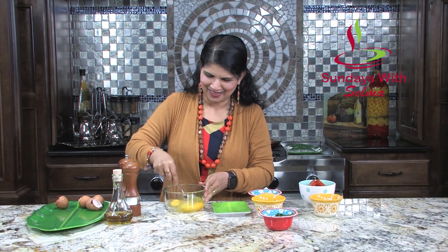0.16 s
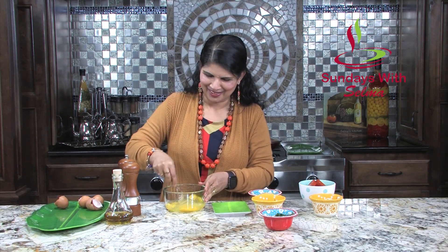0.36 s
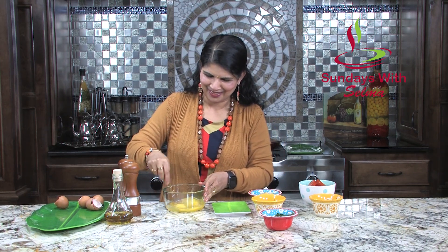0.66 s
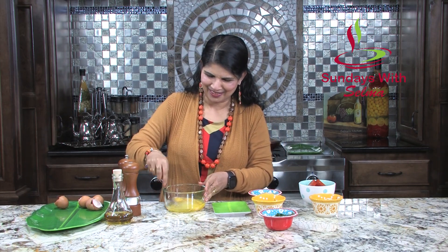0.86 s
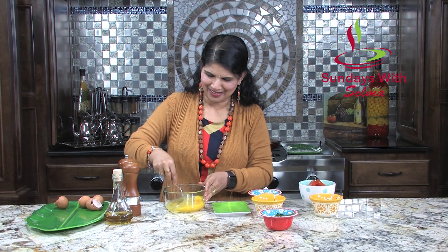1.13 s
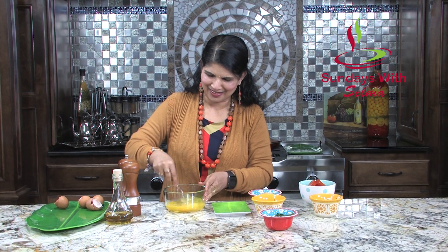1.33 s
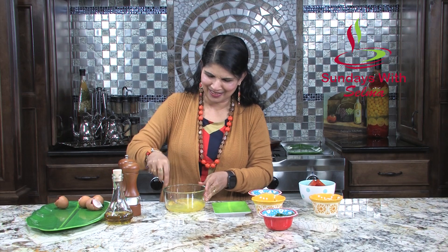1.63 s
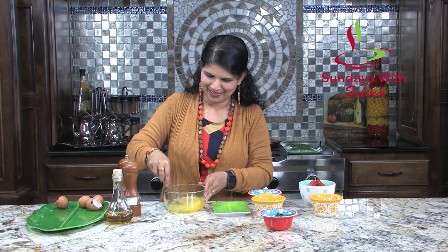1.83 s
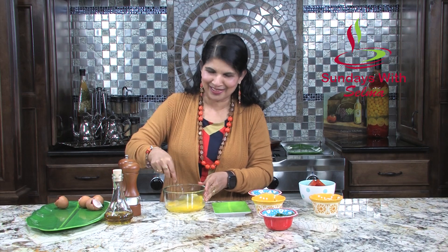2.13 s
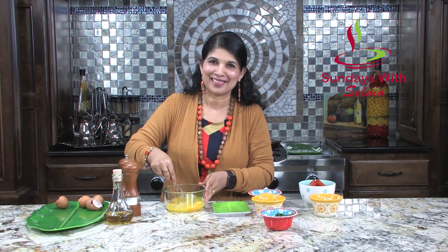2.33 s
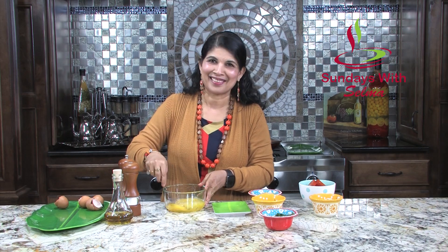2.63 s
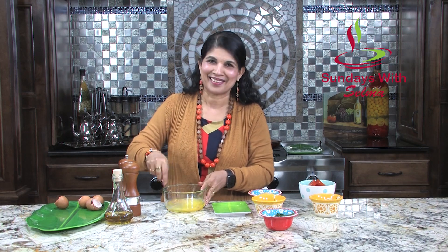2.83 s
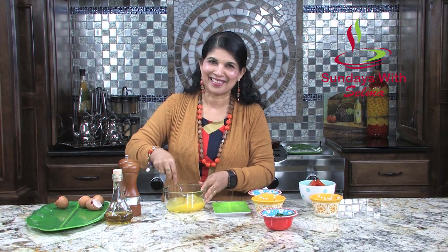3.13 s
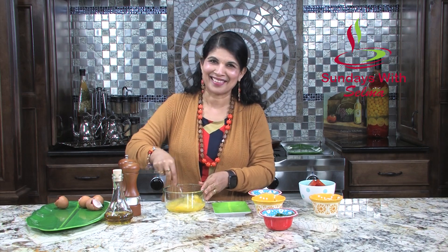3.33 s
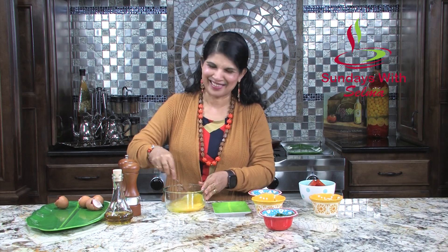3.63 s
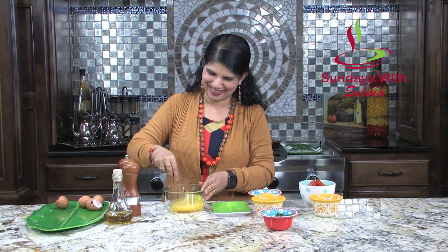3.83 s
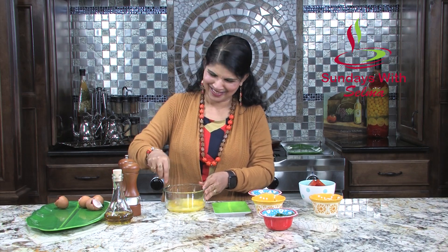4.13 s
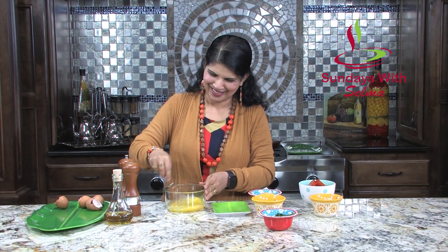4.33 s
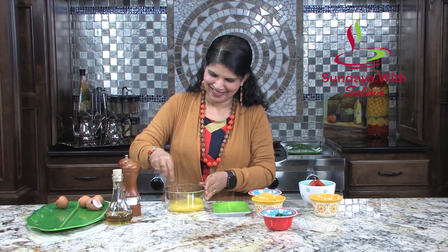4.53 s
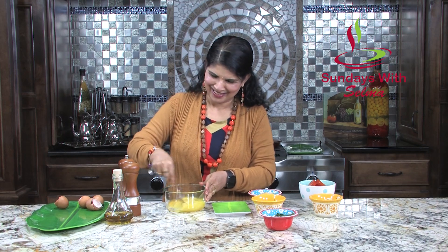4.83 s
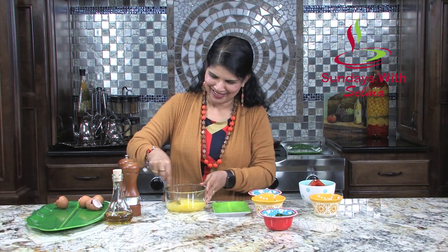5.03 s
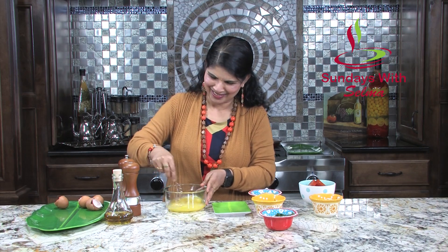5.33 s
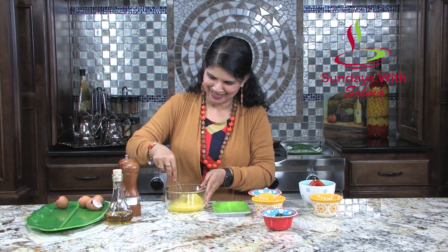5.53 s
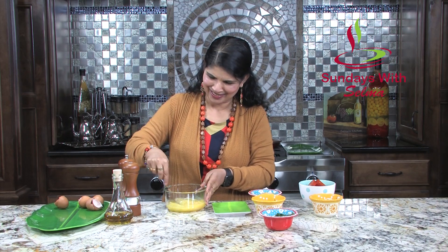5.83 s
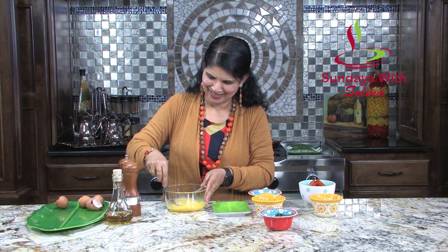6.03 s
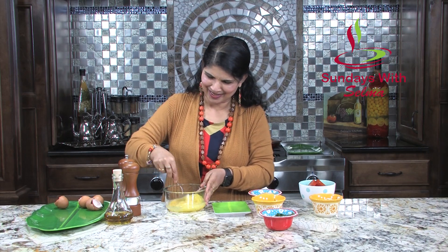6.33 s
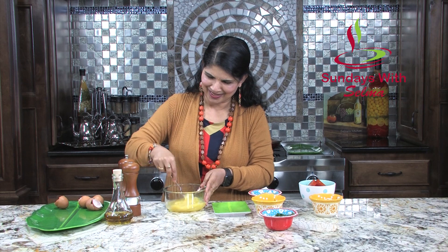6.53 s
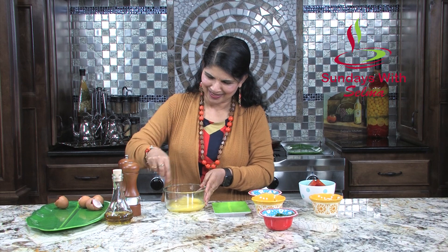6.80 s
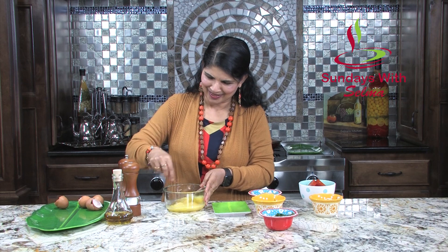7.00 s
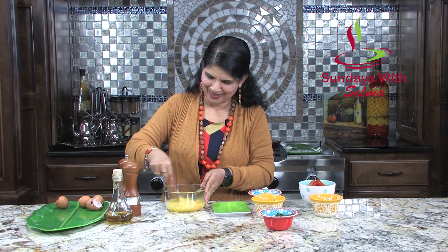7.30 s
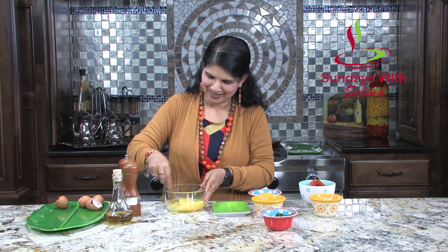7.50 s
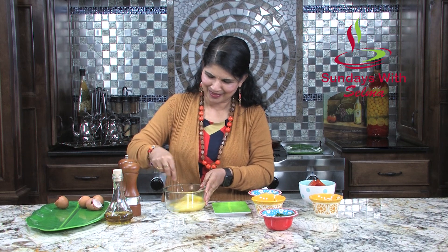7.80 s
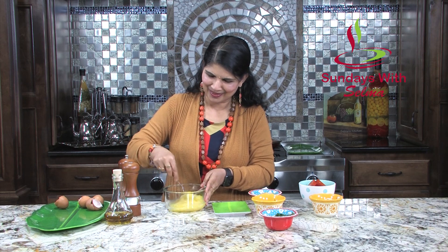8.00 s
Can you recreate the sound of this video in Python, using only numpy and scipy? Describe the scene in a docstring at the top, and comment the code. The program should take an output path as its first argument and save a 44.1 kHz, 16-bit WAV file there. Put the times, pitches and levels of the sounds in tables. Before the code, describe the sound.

A metal fork beats liquid egg in a glass bowl, striking about five times a second. Each stroke gives a crisp, short, damped clink, often with a rattle of tines, plus small wet plops and bubbles. The clinks grow sharper and louder in the last third. One microphone hears it in a reflective kitchen, with a faint low thump after hard hits.

```python
"""Sharp clinks of a fork on a glass bowl, about five strokes a second, in a hard-walled kitchen.
Clinks are noisy tine contacts filtered by a crack and glass rings; plops are damped rising sines in egg.
Plops excite the lowest rings; small bubbles and grazes fill in; sparse noise tails ring the room on.
The single microphone bends under the loud clinks, which adds a low thump after each."""
import sys
import numpy as np
from scipy import signal
from scipy.fft import rfft, irfft
from scipy.io import wavfile

SR = 44100
rng = np.random.default_rng(int(sys.argv[2]) if len(sys.argv) > 2 else 0)


def persist_wave(psi):
    """Save psi, clipped to +-1, as 16-bit WAV."""
    counts = np.round(np.clip(psi, -1, 1) * 32767).astype(np.int16)
    wavfile.write(sys.argv[1], SR, np.atleast_2d(counts).T)


N = 359856  # samples
LEAD_S = 0.015  # longest graze before a clink


def gain_of(db):
    """Decibels to an amplitude factor."""
    return 10 ** (np.asarray(db) / 20)


def read(points, hz, order=1):
    """One table column, interpolated along log frequency."""
    columns = np.transpose(points)
    return np.interp(np.log(hz + 1), np.log(columns[0] + 1), columns[order])


def add(mix, s, sound):
    """Mixes a sound in at time s, cut at the end of the mix."""
    part = mix[round(s * SR):][:len(sound)]
    part += sound[:len(part)]


def causal(db):
    """Minimum-phase pulse for a gain given on an rfft grid."""
    mirrored_db = np.concatenate([db, db[-2:0:-1]])
    log_gain = np.log(gain_of(mirrored_db))
    spectrum = np.exp(np.conj(signal.hilbert(log_gain)))
    return np.fft.ifft(spectrum).real[:len(db) // 2]


# still-room noise spectrum: f/Hz, relative level/dB
AIR_SPECTRUM = [(20, -2), (60, -1), (300, -25.5), (1500, -46), (6000, -15), (16000, -30)]


def still_air(rms_db=-56):
    """Faint steady room noise: Gaussian noise shaped in frequency."""
    hz = np.fft.rfftfreq(N, 1 / SR)
    spectrum = rfft(rng.standard_normal(N)) * gain_of(read(AIR_SPECTRUM, hz))
    noise = irfft(spectrum, N)
    return gain_of(rms_db) * noise / noise.std()


# room tail: f/Hz, t60/s, level/dB
KITCHEN_BANDS = [(830, 0.79, -0.5), (1270, 0.46, -2), (1870, 0.6, 3.5), (2700, 0.53, -1.5), (3240, 0.4, 7),
                 (4600, 0.42, -3.5), (5240, 0.58, -4.5), (9300, .48, 1), (14500, 0.38, -3)]


def kitchen(x, gap_ms=0.76, half_turns_per_s=1.3, bass_cut_hz=845.0):
    """Three sparse tails, each band dying at its own speed, fed in turn as the bowl and hand shift."""
    # one random-sign echo per 20 samples
    taps = np.zeros((3, SR))
    at = np.arange(0, SR - 20, 20) + rng.integers(0, 20, (3, (SR - 1) // 20))
    np.put_along_axis(taps, at, rng.choice([-1., 1.], at.shape), 1)

    hz, t, bands = signal.stft(taps, SR, nperseg=256)
    level_db = read(KITCHEN_BANDS, hz, order=2)[:, None]
    decay_db = 60 * t / read(KITCHEN_BANDS, hz)[:, None]
    tails = signal.istft(bands * gain_of(level_db - decay_db), SR, nperseg=256)[1]

    # echoes arrive in clumps
    clumps = rng.lognormal(0, 0.38, (3, len(t))).repeat(128, axis=1)
    tails = tails * clumps[:, :tails.shape[1]]
    ms = np.arange(tails.shape[1]) * 1e3 / SR
    tails *= 1 - np.exp(-(ms / gap_ms) ** 2)

    half_turns = np.arange(N) * half_turns_per_s / SR + np.arange(3)[:, None] / 3
    share = np.cos(np.pi * half_turns) * np.sqrt(2 / 3)
    wet = signal.fftconvolve(x * share, tails / np.linalg.norm(tails[0]), axes=1)[:, :N].sum(0)
    return signal.sosfilt(signal.butter(2, bass_cut_hz, "high", fs=SR, output="sos"), wet)


# bare contact: f/Hz, level/dB
CONTACT = [(300, -36.5), (1500, -4), (2800, -8.5), (4500, -4.5), (5300, -1.5), (11500, -2.5), (12800, -7.5),
           (15500, -48.5)]
# fork and bowl, damped by hand and egg: nominal f/Hz, nominal width/Hz
RINGS = [(1700, 120), (2760, 110), (3660, 80), (5520, 110), (6240, 300), (7400, 200), (8480, 180),
         (10330, 230), (11780, 170), (13830, 200), (15500, 200)]
# one per ring: nominal level/dB
RING_LEVELS = [-0.5, -9, -2, 12.5, 7, -2.5, 4, 1.5, 1.5, 4.5, -5.5]


def clink(db, chatter_ms, tilt_db_per_oct, spread_db=5.5, shift=0.0096, wider=2.3,
          touches_per_ms=11.0, rise=0.41, uneven=0.34, lead_db=-34.5, lead_ms=5.2):
    """Tine contacts crack and ring the modes: returns the sound straight ahead and that to the walls."""
    hz = np.fft.rfftfreq(4096, 1 / SR)
    chances = rng.uniform(-1.7, 1, (len(RING_LEVELS), 2))
    # uneven colour from clink to clink, 3.5 dB std at the knots
    colour_db = 3.5 * np.interp(hz, np.geomspace(800, 16000, 12), rng.standard_normal(12))
    colour_db += tilt_db_per_oct * np.clip(np.log2((hz + 1) / 7000), -2, 1)

    def body(blur, ring_spread_db):
        """Crack plus resonances; egg and grip shift each ring a little from blow to blow."""
        power = gain_of(2 * read(CONTACT, hz))
        for (f, width), level_db, (a, b) in zip(RINGS, RING_LEVELS, chances):
            detune = 2 * (hz - f * (1 + shift * b)) / width / blur
            power += gain_of(2 * (level_db + ring_spread_db * a)) / blur / (1 + detune ** 2)
        return causal(10 * np.log10(power) + colour_db)

    weight, heft = rng.standard_normal((2, 1400))
    chance = rng.random(1400)
    ms = (np.arange(1400) / SR - LEAD_S) * 1e3
    u = np.maximum(ms / chatter_ms, 0)
    # faint graze as the tines close in, then uneven contacts that die away
    force = np.tanh(u / rise) * np.exp(-2 * u)
    force += gain_of(lead_db) * np.exp(-abs(ms) / lead_ms)
    force *= np.exp(uneven * heft) * (chance < touches_per_ms * 1e3 / SR)

    ahead = signal.fftconvolve(weight * force, body(0.66, spread_db))
    # over all directions only the body's colour remains, its rings smeared and evened
    around = body(wider, spread_db / 2)
    size = gain_of(db) * np.sqrt(chatter_ms * SR / 1e3)
    return size * ahead / np.linalg.norm(ahead), size * around / np.linalg.norm(around)


# tines meet the glass: t/s, level/dB, chatter/ms, treble lean/(dB/octave)
STROKES = [(0.117, -29, 1.1, -8.5), (0.142, -12, 0.29, -2.5), (0.149, -27.5, 15, 0.5),
           (0.3458, -23.5, 2.2, -5.5), (0.3536, -17.5, 3.5, -2.5), (0.3615, -16, 1.9, -2.5),
           (0.5547, -18.5, 3.5, -1), (0.7414, -22, 2.2, -2.5), (0.7495, -19, 5.2, -1),
           (0.9353, -19, 2.2, -11), (0.939, -13, 2.34, -1), (1.132, -18.5, 5.7, -2.5),
           (1.3218, -14.5, 2.7, 0), (1.416, -34, 1.1, 8), (1.512, -13, 5.1, -1), (1.6965, -29, 1.8, -5),
           (1.705, -18.5, 4.2, 0), (1.746, -27, 4.4, 4), (1.8858, -28, 1.5, -18), (1.8907, -11.5, 1.75, 1),
           (1.94, -27, 0.82, -1), (2.081, -12, 0.89, 1.5), (2.304, -13.5, 3.75, 0.5),
           (2.375, -30.0, 4.1, -5), (2.4979, -25.5, 1.5, -2.5), (2.504, -16.5, 2.9, -1),
           (2.67, -30.5, 1.55, 9.5), (2.7048, -19, 3.4, 1.5), (2.8675, -19.5, 0.45, -4),
           (2.9133, -19.5, 13, -3), (2.9221, -20.5, 3.2, -3.5), (3.1244, -17.5, 4.8, 0),
           (3.14, -20, 3.7, 3), (3.1668, -19.5, 0.26, 1), (3.3289, -15, 2.7, 2), (3.3763, -20.5, 1.3, 2),
           (3.534, -15, 1.06, 2.0), (3.5473, -12.5, 1.65, -0.5), (3.6037, -27, 5.4, -1),
           (3.772, -17.5, 0.95, -5), (3.7753, -20, 1.8, -3), (3.7853, -18, 2.9, -0.5),
           (3.8178, -23.5, 0.7, 1), (3.8389, -26, 4.4, -1.5), (4.005, -16.5, 3.8, 1.5),
           (4.041, -21, 0.65, 0), (4.2092, -23.5, 1.5, -4), (4.2264, -21.5, 5.1, 1), (4.284, -29, 1.5, -2),
           (4.432, -24, 4.3, -5.5), (4.437, -20, 7.4, 2.5), (4.49, -24.5, 0.8, -6), (4.616, -34, 0.8, -5),
           (4.64, -29.5, 1.2, -11), (4.6569, -12.5, 1.86, -2), (4.6921, -25.5, 1.1, -1.5),
           (4.8429, -14, 0.31, -3.0), (4.854, -21.5, 1.1, -16), (4.8599, -18.5, 4.6, -0.5),
           (5.0603, -11.5, 1.3, 2), (5.1033, -26, 0.89, -7), (5.125, -24.5, 3.5, 4),
           (5.2483, -23.5, 1.3, -7), (5.2642, -20, 4.4, 0), (5.3082, -23.5, 1.0, 1), (5.324, -23, 2.4, 0.5),
           (5.4627, -11.5, 1.15, 1.5), (5.5131, -24.5, 3.9, 2.5), (5.6734, -20, 5.2, -0.5),
           (5.7262, -25.5, 2.3, 2), (5.7648, -30, 1.5, -5), (5.881, -9.5, 0.41, 0),
           (6.085, -17, 0.85, -2.5), (6.0912, -11.5, 1.43, 3), (6.147, -23, 5.7, 0),
           (6.2916, -20.5, 0.85, -4), (6.299, -7, 0.82, -1), (6.469, -26.5, 2.7, 1),
           (6.501, -7.5, 0.48, -0.0), (6.511, -14.5, 1.1, 3), (6.532, -23, 0.71, -2),
           (6.6994, -15, 1.1, 3.5), (6.7487, -21.5, 6.1, -0.5), (6.9016, -10, 1.03, -0.5),
           (6.961, -22, 2.2, 2.5), (7.0873, -19, 0.96, -7), (7.1095, -10, 1.1, -1),
           (7.1448, -20, 3.9, -0.5), (7.3032, -15, 2.2, -4), (7.3142, -14, 1, 0), (7.3681, -19.5, 1.1, 0.5),
           (7.5279, -13.5, 3.3, -3.5), (7.728, -20, 0.99, -7), (7.74, -10, 1.7, -2.5),
           (7.9484, -14, 1.7, -11.5), (7.9519, -18.5, 5.4, -1), (7.996, -22, 0.82, 7.5)]


def strokes(near, walls):
    """Fork blows: chatter goes ahead, its smeared colour goes to the walls."""
    for s, *row in STROKES:
        ahead, around = clink(*row)
        add(near, s - LEAD_S, ahead)
        add(walls, s, gain_of(-7.5) * around)
    # the stroke before still hangs in the room
    add(walls, 0, clink(-25.5, 2.0, 0)[1])


def plop(db, hz, t60_ms, rise_ms=0.57, climb=0.026):
    """A bubble rings briefly and climbs in pitch as it nears the surface."""
    t = np.arange(round(t60_ms * SR / 1e3) + 50) / SR
    u = t * 1e3 / t60_ms
    shape = (1 - np.exp(-t * 1e3 / rise_ms)) * gain_of(db - 60 * u)
    return -shape * np.sin(2 * np.pi * hz * t * (1 + climb * u))


# air pockets and slaps in the egg: t/s, level/dB, f/Hz
POCKETS = [(0.117, -23, 582), (.164, -32, 1730), (.21, -32, 1470), (0.348, -16, 1280), (0.386, -23, 1270),
           (0.437, -32, 1320), (0.354, -11, 2950), (0.538, -24, 1560), (.549, -26, 750),
           (0.5645, -20.5, 1025), (0.5816, -17.5, 1736), (.706, -26, 1644), (0.7492, -15, 4360),
           (0.7513, -11.5, 2330), (0.9379, -10.5, 2430), (1.1299, -20.5, 1404), (1.166, -24.5, 1150),
           (1.3054, -39, 2680), (1.4225, -32, 1430), (1.5112, -20, 976), (1.534, -25, 650),
           (1.6994, -16.5, 1470), (1.706, -20, 630), (1.749, -25, 1690), (1.8896, -15.5, 892),
           (2.0827, -20, 1626), (2.115, -23, 1186), (2.154, -27.5, 970), (2.155, -24.5, 2306),
           (2.3028, -14.5, 1980), (2.5006, -25.5, 1003), (2.5847, -21.5, 3140), (2.867, -21, 1073),
           (2.9175, -14, 2300), (2.9227, -20, 1050), (2.972, -18.5, 1654), (3.3137, -27, 1940),
           (3.3782, -26, 1680), (3.3782, -18.5, 3620), (3.424, -36, 1180), (3.4979, -36.5, 1680),
           (3.5352, -21.5, 1084), (3.612, -26, 1680), (3.771, -12, 738), (3.989, -18, 1840),
           (4.192, -22.5, 970), (4.2094, -24.5, 993), (4.492, -28, 1136), (4.658, -21.5, 2020),
           (4.724, -24.5, 1360), (4.759, -21, 1100), (4.8446, -20, 977), (5.062, -12.5, 2110),
           (5.0896, -21, 1940), (5.1266, -20.5, 1700), (5.2278, -29, 1880), (5.247, -21.5, 3350),
           (5.264, -13, 852), (5.509, -26, 1640), (5.6584, -29, 3730), (5.739, -18.5, 3530),
           (6.087, -22, 1780), (6.094, -12, 922), (6.152, -24, 1700), (6.3, -26.5, 1550),
           (6.3318, -24.5, 1730), (6.47, -27, 945), (6.5007, -18, 2490), (6.703, -22, 1606),
           (6.754, -12.5, 3590), (6.8943, -13.5, 1016), (6.9364, -19.5, 1570), (7.0876, -18, 956),
           (7.113, -22, 697), (7.146, -15, 3700), (7.272, -26.5, 1655), (7.305, -15, 654),
           (7.3564, -19, 997), (7.382, -14, 4200), (7.526, -19, 620), (7.5261, -18.5, 970),
           (7.7428, -11.5, 705), (7.9473, -13, 1820), (7.947, -22.5, 515), (8.128, -29.5, 1560)]


def pockets(egg, walls, t60_at_1khz_ms=31.6, quickens=0.88, wall_t60_ratio=0.41):
    """Air pockets plop in the egg; smaller, higher ones die sooner."""
    for s, db, hz in POCKETS:
        t60_ms = t60_at_1khz_ms * (1e3 / hz) ** quickens
        sound = plop(db, hz, t60_ms)
        # the slap that opens the pocket
        add(sound, 0, plop(db - 12.0, 3.17 * hz, 0.47 * t60_ms, 0.5))
        add(egg, s, sound)
        # the bowl beams high plops upward: less of them reaches the walls, shorter and broader
        wall_gain = gain_of(1.0 - 5.75 * np.log2(hz / 800))
        add(walls, s, wall_gain * plop(db + 4.5, hz, t60_ms * wall_t60_ratio, climb=0.036))


def bowl(egg, db=-1.0):
    """Plops close in pitch to the three lowest rings set the glass going."""
    rings = [signal.lfilter(*signal.iirpeak(f, f / width, SR), egg) for f, width in RINGS[:3]]
    return gain_of(db) * sum(rings)


def slosh(tries_per_s=900, db=-40.0, spread_db=4.0, lag_s=0.036,
          graze_db=-39.5, graze_tries_per_s=190, most=3.):
    """Small bubbles ring and tines graze the glass lightly, most often just after the firm strokes."""
    stir = np.zeros(N)
    for s, level_db, *_ in STROKES:
        add(stir, s, gain_of(level_db * .5) * np.exp(-np.arange(9000) / SR / lag_s))
    stir = stir / stir.mean() / most  # chance that a try sounds
    out = np.zeros(N)

    for place, u, size, cycles, chance in rng.random((round(tries_per_s * N / SR), 5)):
        hz = 1100 * 4.89 ** u
        if chance < stir[int(place * N)]:
            t60_ms = (5200.0 + 33400.0 * cycles) / hz
            add(out, place * N / SR, plop(db - spread_db * np.log(size + 0.21), hz, t60_ms))

    grazes = []
    for length, lean in rng.random((40, 2)):
        ahead, _ = clink(graze_db, .5 + 2.1 * length, 9.8 * (lean - .5))
        grazes.append(ahead[round(LEAD_S * SR):])
    for place, pick, size, chance in rng.random((round(graze_tries_per_s * N / SR), 4)):
        if chance < stir[int(place * N)]:
            graze = grazes[int(pick * len(grazes))]
            add(out, place * N / SR, gain_of(-3.5 * np.log(size + 0.056)) * graze)
    return out


def scene():
    """Fork, egg and room, heard from one point."""
    near, egg = slosh(), np.zeros(N)
    walls = gain_of(-17.5) * near
    strokes(near, walls)
    pockets(egg, walls)
    glass = bowl(egg)
    room = kitchen(walls + gain_of(-6.5) * glass)
    mono = near + egg + glass + room + still_air()
    return np.array([mono, mono])


def record(dry, bend=2.63, smooth_hz=81.0, low_hz=27.6, damping=0.24, edge_hz=16800):
    """A lopsided response rectifies peaks; the bass roll-off swings back after them; then the band limit."""
    rectified = dry * np.tanh(dry * 7.9) / 4.72
    slow = signal.sosfilt(signal.butter(1, smooth_hz, fs=SR, output="sos"), rectified)
    w = 2 * np.pi * low_hz
    b, a = signal.bilinear([1, 0, 0], [1, 2 * damping * w, w ** 2], SR)
    out = np.clip(signal.lfilter(b, a, dry - bend * slow), -1, 1)
    band_limit = signal.firwin(511, edge_hz, window=("kaiser", 9), fs=SR)
    return signal.oaconvolve(out, band_limit[None], "same")


dry = scene()
out = record(dry)
persist_wave(out)
```